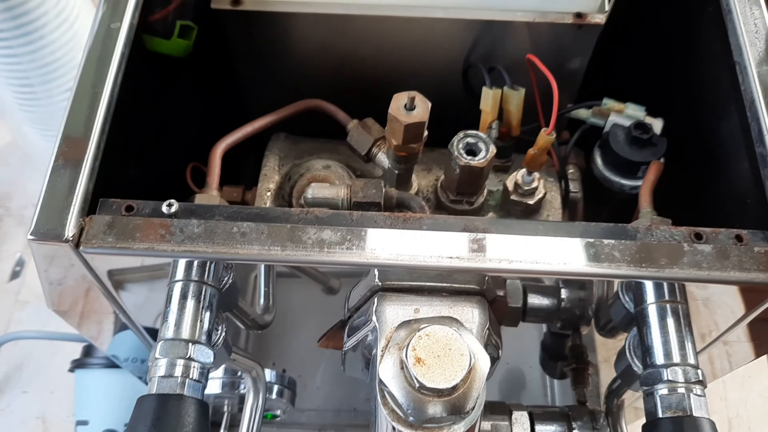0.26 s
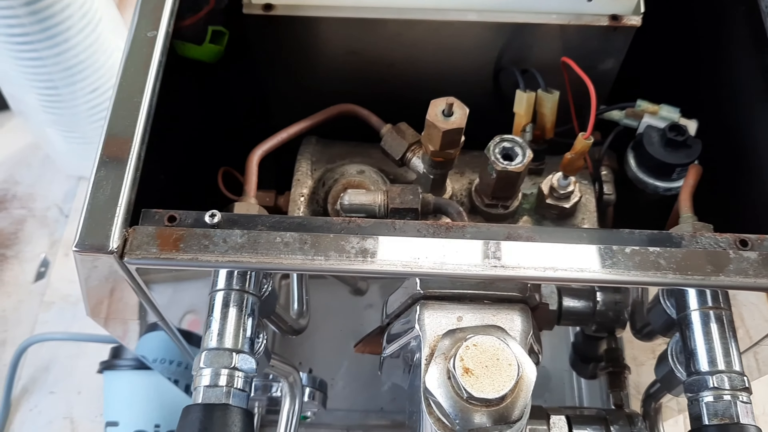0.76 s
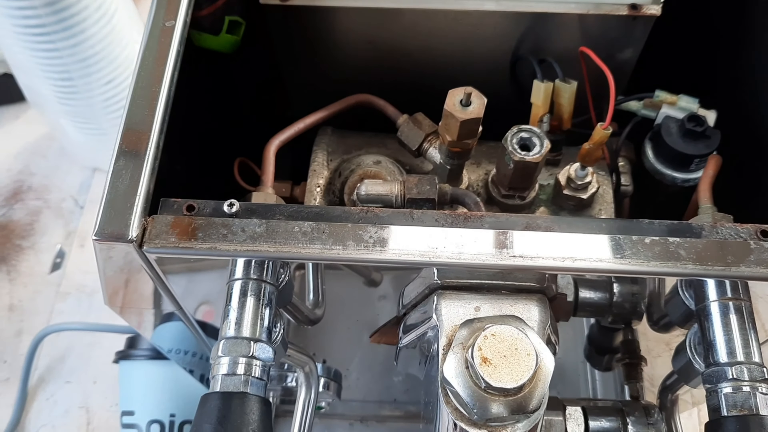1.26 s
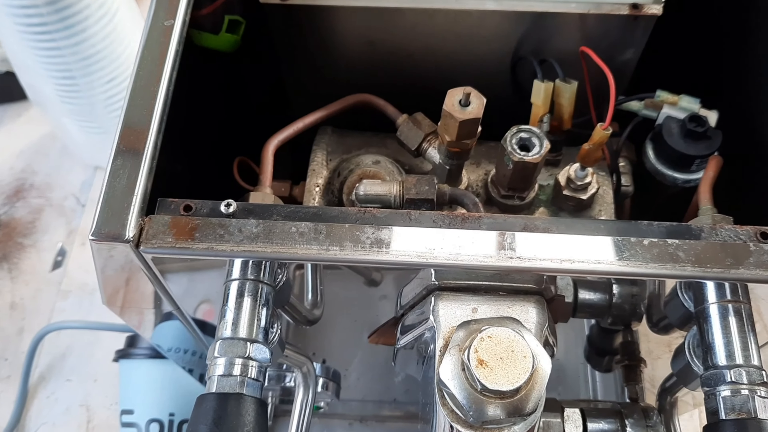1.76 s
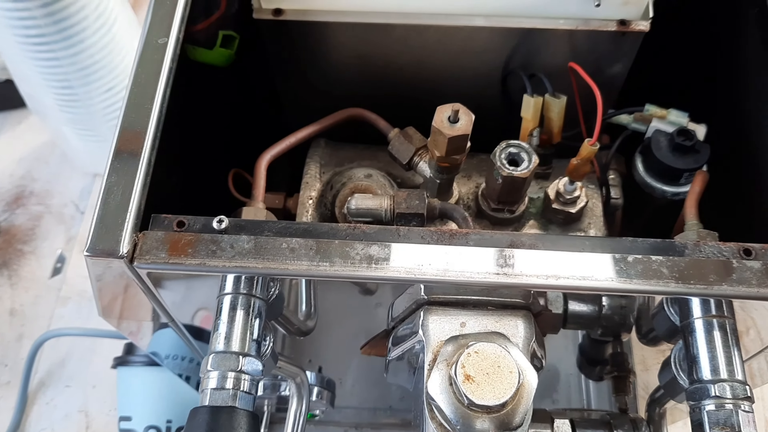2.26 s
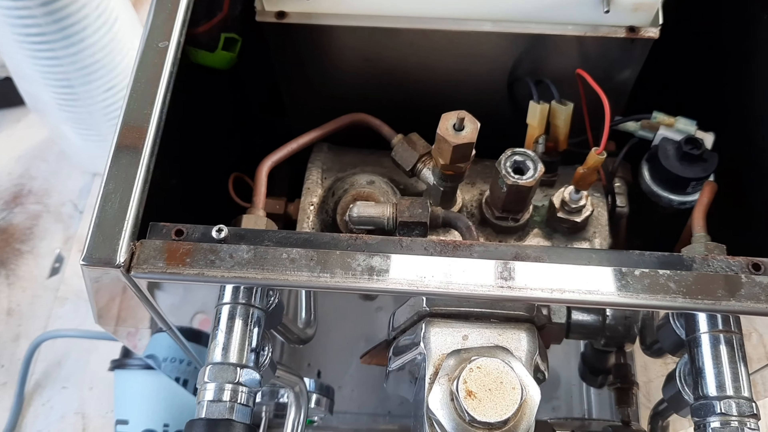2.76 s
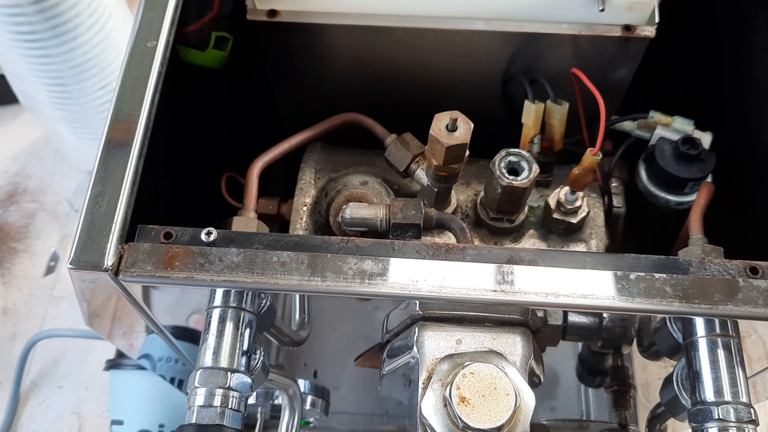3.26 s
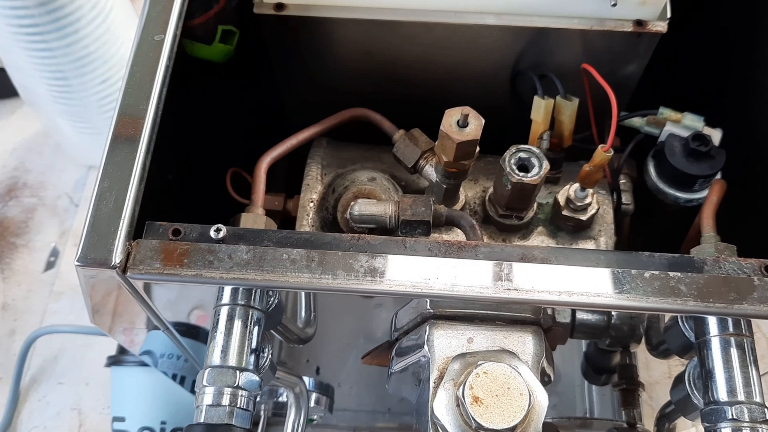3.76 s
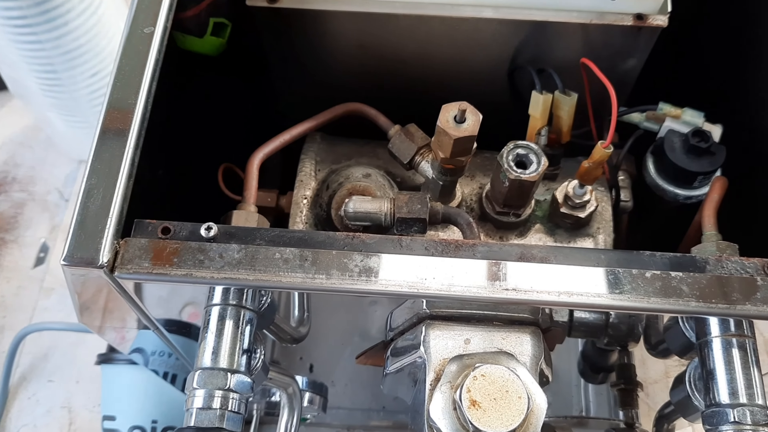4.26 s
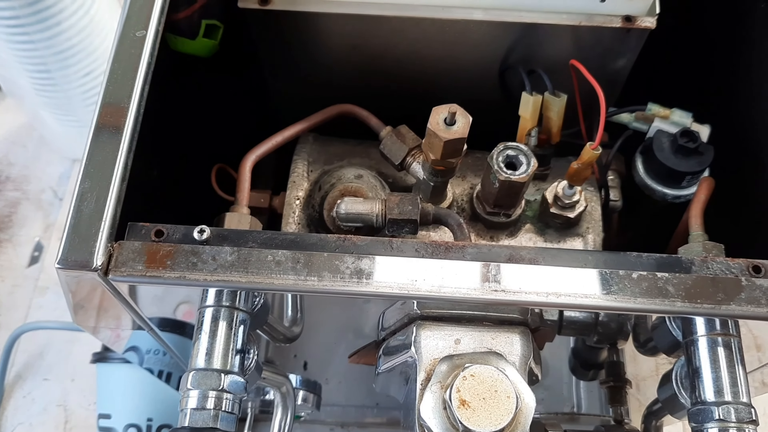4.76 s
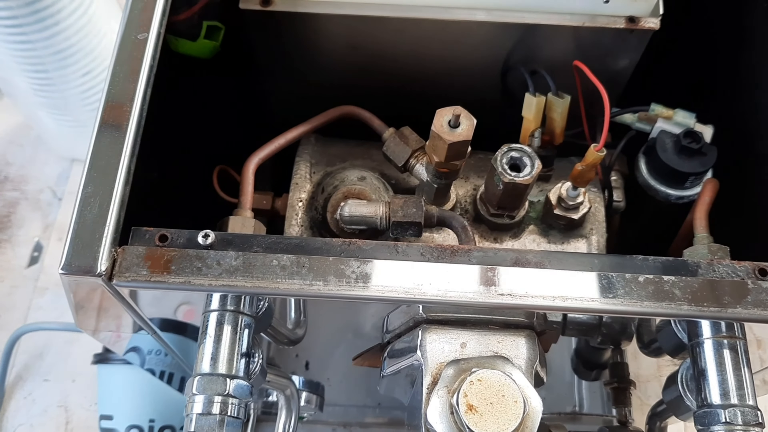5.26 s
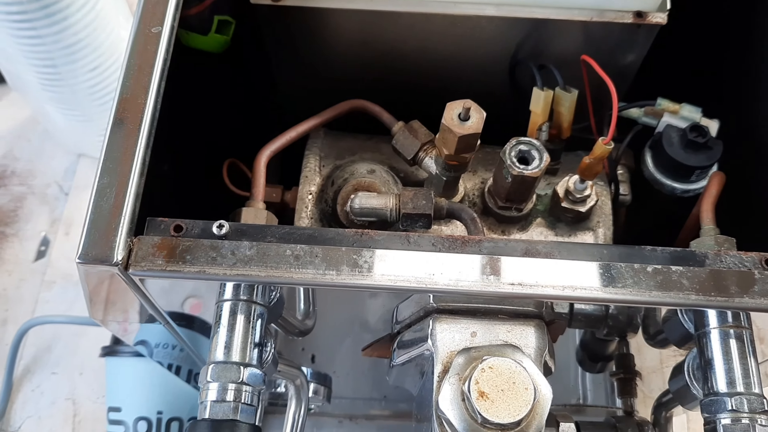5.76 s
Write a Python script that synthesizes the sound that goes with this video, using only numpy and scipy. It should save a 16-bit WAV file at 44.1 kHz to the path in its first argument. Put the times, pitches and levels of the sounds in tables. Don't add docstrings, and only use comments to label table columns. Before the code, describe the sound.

A boiler valve hisses without pause for about 6 seconds, close to a hand-held stereo microphone in a workshop. The hiss is thin, bright and sizzling, strongest in the high treble, with slight metallic colouring from the housing and pipe; its tone and stereo image drift gently as the hand turns. Under it lie a low rumble of distant machines, fading slightly, and a faint steady 100 Hz electrical hum. At about 0.13 s a heavy load scrapes in far off, lands with a dull woody thud at 0.2-0.28 s and rocks with weaker knocks until 0.4 s, leaving a short room echo. Around 1.6 s a very faint fuzzy whistle flickers in the valve. Near 2 s a slight pipe resonance colours the jet. Pressure rises subtly towards 2.8 s, making the hiss a touch brighter, then eases and continues evenly to the end.

```python
import sys
import numpy as np
from scipy import signal
from scipy.fft import rfft, irfft
from scipy.io import wavfile
from scipy.ndimage import uniform_filter1d

SR = 44100
rng = np.random.default_rng(int(sys.argv[2]) if len(sys.argv) > 2 else 0)


def generate_wav(sig):
    pcm = np.round(np.clip(np.atleast_2d(sig).T, -1, 1) * 32767).astype(np.int16)
    wavfile.write(sys.argv[1], SR, pcm)


def magnitude_from_level(level_db):
    exponent = np.asarray(level_db, float) / 20
    return 10 ** exponent


N = 265471


def evened(x):
    return x / np.sqrt(np.mean(x ** 2) + 1e-20)


def read(points, hz, column=1):
    table = np.transpose(points)
    return np.interp(np.log(hz + 1), np.log(table[0] + 1), table[column])


def lifts(peaks, hz):
    return sum(db / (1 + (2 * (hz - f) / width) ** 2) for f, width, db in peaks)


def drift(t, top_hz):
    rates = np.geomspace(top_hz / 20, top_hz, num=24)
    return evened(sum(np.sin(2 * np.pi * (f * t + rng.random())) / np.sqrt(f) for f in rates))


def smeared(x, bins, frames):
    across = uniform_filter1d(x, size=bins, axis=0)
    return evened(uniform_filter1d(across, size=frames, axis=1))


def two_ports(gain_db, same, phase, balance_db, size):
    a, b, c, d = rng.standard_normal(gain_db.T.shape + (4,)).T
    same = np.clip(same, -1, 1)
    left = a + 1j * b
    right = same * left * np.exp(-1j * phase) + np.sqrt(1 - same ** 2) * (c + 1j * d)
    z = np.array([left * magnitude_from_level(balance_db / 2), right / magnitude_from_level(balance_db / 2)]) * magnitude_from_level(gain_db)
    return evened(signal.istft(z, nperseg=size, noverlap=size * 3 // 4)[1][:, :N])


# (time [s], level [dB])
PRESSURE = [
    (0, -38),
    (.45, -38),
    (.8, -38),
    (2, -38),
    (2.8, -37),
    (4, -37.6),
    (5, -37.5),
    (6.02, -38),
]
# (frequency [Hz], density [dB per Hz])
JET = [(700, -25.5), (1200, -16.5), (2050, -16), (2500, -11), (3300, -11), (4000, -9), (5200, -9.5),
       (6000, -6.5), (7000, -7.5), (8500, -4.5), (8900, -11), (10000, -10), (12000, 0), (15800, -1)]
# (frequency [Hz], width [Hz], lift [dB])
HOUSING = [(1420, 21, 1.5), (2360, 89, 1.5), (2540, 73, 2), (2730, 100, 2), (3085, 120, -4.5),
           (5750, 900, 1.5), (7530, 570, 4), (11600, 200, 1), (13300, 680, 4), (14650, 1240, 7)]
# (frequency [Hz], width [Hz], lift [dB per microsecond of lead])
FACING = [(14400, 970, 0.1), (13250, 450, -0.1), (9700, 1500, 0.03)]
# (frequency [Hz], likeness [0-1], left lead [rad], left minus right [dB])
PORTS = [(1100, .25, 0, .5), (2150, .65, -.3, .8), (2570, .4, -2.3, 0), (2800, .15, -.3, -.3),
         (6000, .36, -.9, -1.8), (7600, .6, -.8, 1), (8600, .4, -2.1, -2.2), (9600, .3, -.9, .6),
         (11500, .5, -.75, 3.3), (12550, .12, -1.4, 1.8), (13230, .42, -4.1, 1), (13700, .5, -2.3, -2.4),
         (14650, .75, -2.4, .1), (15600, .3, -2.1, -1.5)]
# (time [s], extra lead of the left port [microseconds])
SWAY = [(0, 3), (.37, 16), (.9, -15), (1.12, -17), (2.1, -3), (2.6, -7), (3.1, 0), (3.9, 1), (5, 11),
        (5.7, 1), (6.02, 1)]


def steam():
    hz = np.fft.rfftfreq(1024, 1 / SR)[:, None]
    t = np.arange(N // 256 + 5) * 256 / SR
    s, level_db = np.transpose(PRESSURE)
    lead_us = np.interp(t, *np.transpose(SWAY))
    *slow, quick = rng.standard_normal((len(t), len(hz), 4)).T
    ripple, skew, tilt = (smeared(r, bins=2, frames=300) for r in slow)
    eddies = smeared(quick, bins=24, frames=10)

    gain_db = read(JET, hz) + lifts(HOUSING, hz) + lead_us * lifts(FACING, hz)
    bright_db = -1.73 + 0.9 * (level_db + 37.5)
    gain_db += np.clip((hz - 9000) / 4000, 0, 1) * np.interp(t, s, bright_db)
    pipe_hz, quiet_db, sing_db = 2715, 2, 7
    pipe_db = quiet_db + (sing_db - quiet_db) * np.exp(-((t - 2.2) / 1.7) ** 4)
    gain_db += lifts([(pipe_hz, 55, pipe_db)], hz)
    gain_db += 1.2 * np.cos(2 * np.pi * (hz - pipe_hz) / 325) * np.exp(-(hz / 4500) ** 2)
    gain_db += 1.3 * ripple + .5 * eddies + 0.34 * drift(t, 12)

    phase = read(PORTS, hz, column=2) + 2 * np.pi * hz * lead_us / 10 ** 6
    phase += .45 * skew
    balance_db = read(PORTS, hz, column=3) + 2.2 * tilt
    jet = two_ports(gain_db, 1.12 * read(PORTS, hz), phase, balance_db, size=1024)
    return jet * magnitude_from_level(np.interp(np.arange(N) / SR, s, level_db) + 10.0)


# (frequency [Hz], density [dB per Hz])
RUMBLE = [(12, -56), (20, -32), (43, -8), (70, -9), (98, -7), (124, -9), (151, -11), (195, -11),
          (246, -19.5), (312, -14), (489, -22), (597, -18.5), (888, -29), (1420, -27), (1500, -51),
          (1950, -60), (3300, -120)]
# (frequency [Hz], likeness [0-1])
RUMBLE_SAME = [(60, .92), (200, .93), (330, .75), (500, .4), (800, .15), (1200, .4)]
# (frequency [Hz], width [Hz], lift [dB])
ROOM_TONES = [(150, 8.3, 3), (184, 10, 4.5), (329.7, 16.4, 8.5), (393, 45, 5.5), (610, 76, 0.5)]


def rumble():
    hz = np.fft.rfftfreq(4096, 1 / SR)[:, None]
    t = np.arange(N // 1024 + 5) * 1024 / SR
    sink_db = 0.21 * t
    gain_db = read(RUMBLE, hz) + lifts(ROOM_TONES, hz) + 0.64 * drift(t, 6.6) - sink_db
    return magnitude_from_level(-49.5) * two_ports(gain_db, read(RUMBLE_SAME, hz), 0 * hz, 0 * hz, size=4096)


# (level [dB], wavering [dB])
HUM = [
    (0, .7),
    (-19.5, 1.5),
    (-19, 2),
]


def hum():
    t = np.arange(N) / SR
    level_db = -42.5 + 2 * np.exp(-t / .6) - 0.08 * t
    turn = 2 * np.pi * (100.01 * t - .1) + np.array([[.11], [-.11]])
    tone = 0
    for k, (db, waver_db) in enumerate(HUM, 1):
        tone = tone + magnitude_from_level(db + waver_db * drift(t, 5)) * np.sqrt(2) * np.sin(k * turn)
    return tone * magnitude_from_level(level_db + np.array([[-.3], [.3]]))


# (frequency [Hz], t60 [s])
SHOP = [(100, 0.33), (300, 0.43), (1000, 0.58), (3000, 0.73)]


def shop(x):
    taps = np.zeros((2, SR))
    at = np.arange(200, SR - 20, 20) + rng.integers(0, 20, (2, (SR - 201) // 20))
    np.put_along_axis(taps, at, rng.choice([-1., 1.], at.shape), 1)
    apart = signal.sosfilt(signal.butter(1, 450, "high", fs=SR, output="sos"), taps[1])
    taps = taps[0] + 1.1 * np.array([apart, -apart])
    hz, t, z = signal.stft(taps, SR, nperseg=512)
    fade = magnitude_from_level(-60 * t / read(SHOP, hz)[:, None])
    tail = signal.istft(z * fade, SR, nperseg=512)[1]
    return signal.fftconvolve(x[None], tail / np.linalg.norm(tail[0]), axes=1)[:, :N]


# (time [s], peak level [dB], low weight [dB])
BLOWS = [(.131, -34.5, 11), (.166, -27, 4), (.198, -21, 11), (.212, -18, 6.5), (.224, -19, -12),
         (.24, -19, -6), (.258, -19, -4), (.276, -23, 11), (.303, -25, -8), (.347, -28.5, 2),
         (.394, -30.5, -6)]
# (frequency [Hz], level [dB], t60 [s])
LOAD = [(60, -8, 0.17), (100.6, 4, 0.13), (150, -7, 0.14), (223, -5, 0.053), (250, 3, 0.13),
        (277.6, 1.5, 0.12), (332, 1.5, 0.11), (397, 0, 0.1)]
# (frequency [Hz], density [dB per Hz])
SCUFF = [(120, -30), (200, -16), (270, -4), (340, 0), (480, -12), (640, -8.5), (850, -12.5), (1100, -16),
         (1500, -23.5), (2050, -22), (2600, -33), (3400, -60)]


def thud():
    t, out = np.arange(SR // 2) / SR, np.zeros(N)
    hz, mode_db, t60 = np.transpose(LOAD)[:, :, None]
    spots = rng.standard_normal((len(BLOWS), len(LOAD), 1))
    noise = rfft(rng.standard_normal((len(BLOWS), len(t))))
    rattles = evened(irfft(noise * magnitude_from_level(read(SCUFF, np.fft.rfftfreq(len(t), 1 / SR)))))
    for (s, db, weight_db), spot, rattle in zip(BLOWS, spots, rattles):
        ring_db = mode_db + weight_db * (hz < 200) + 2.4 * spot - 60 * t / t60
        ring = (magnitude_from_level(ring_db) * np.sin(2 * np.pi * hz * t)).sum(0)
        blow = magnitude_from_level(-9.5) * ring + magnitude_from_level(-8 - 60 * t / 0.12) * rattle
        soft_onset = 1 - np.exp(-t / 0.0051)
        out[round(s * SR):][:len(t)] += magnitude_from_level(db) * blow * soft_onset
    return magnitude_from_level(-2) * out + magnitude_from_level(1.5) * shop(out)


# (time [s], level [dB], frequency [Hz], length [s])
CHIRPS = [
    (1.64, -51, 1870, 0.18),
]


def whistle():
    t, out = np.arange(N) / SR, np.zeros((2, N))
    for s, db, hz, length in CHIRPS:
        fuzz = signal.lfilter([1], [1, -.985], rng.standard_normal((2, N)))
        swell = np.exp(-((t - s) / length * 2) ** 2)
        out += magnitude_from_level(db) * evened(fuzz) * np.cos(2 * np.pi * hz * t) * swell
    return out


def scene():
    return steam() + rumble() + hum() + thud() + whistle()


def low_pass(x):
    return signal.sosfilt(signal.butter(12, 15760, fs=SR, output="sos"), x)


def record(dry):
    thin = signal.sosfilt(signal.butter(2, 45, "high", fs=SR, output="sos"), dry)
    return low_pass(thin)


dry = scene()
out = record(dry)
generate_wav(out)
```